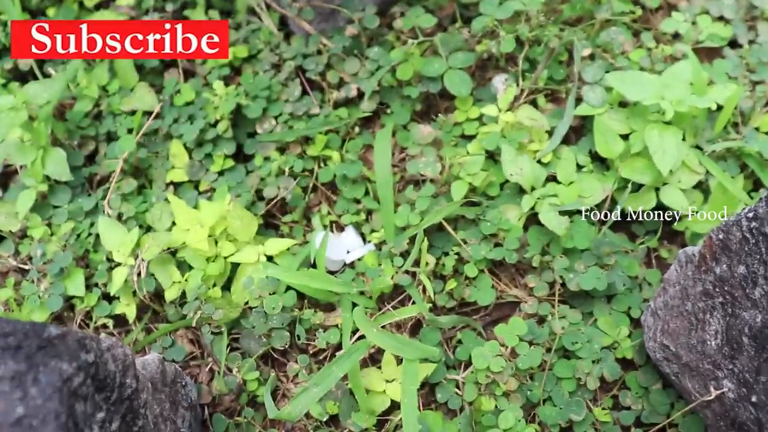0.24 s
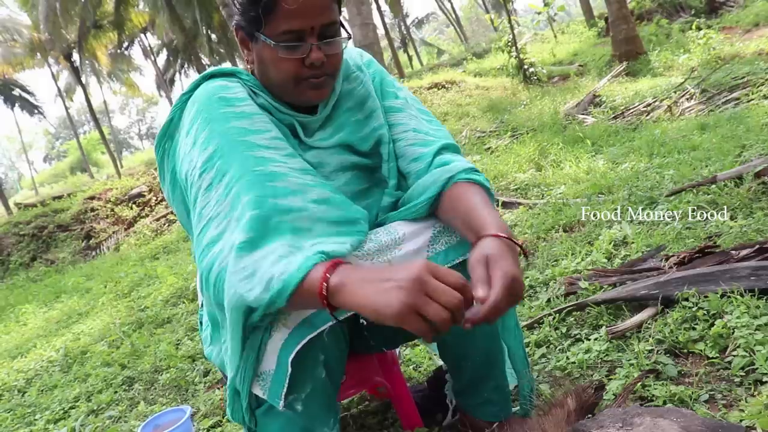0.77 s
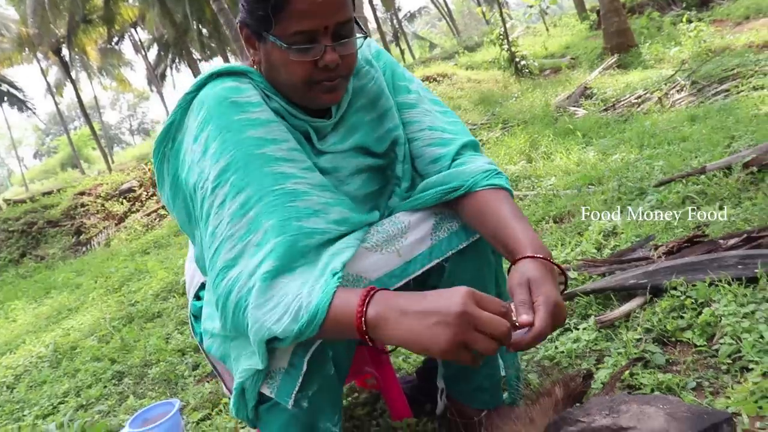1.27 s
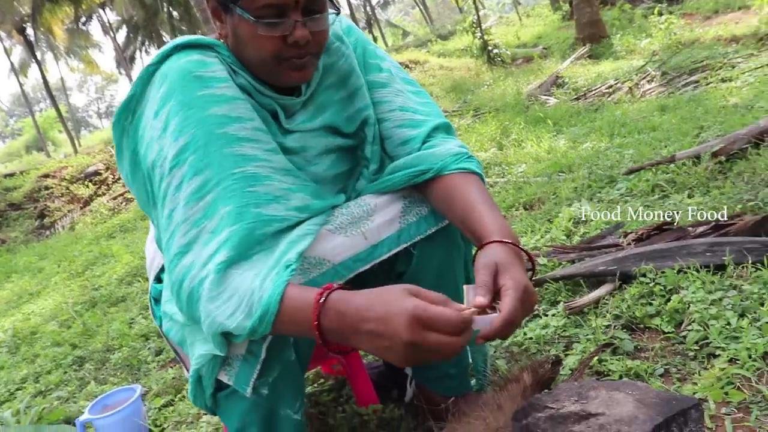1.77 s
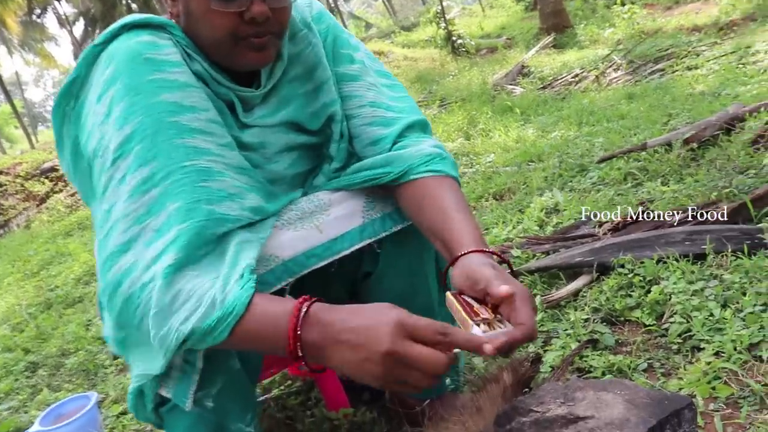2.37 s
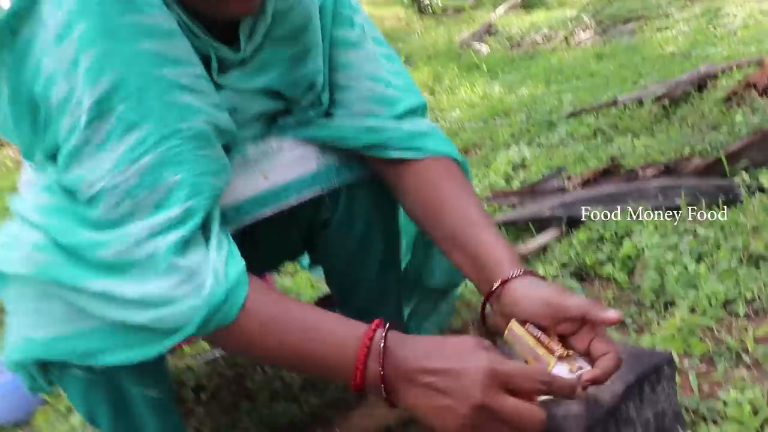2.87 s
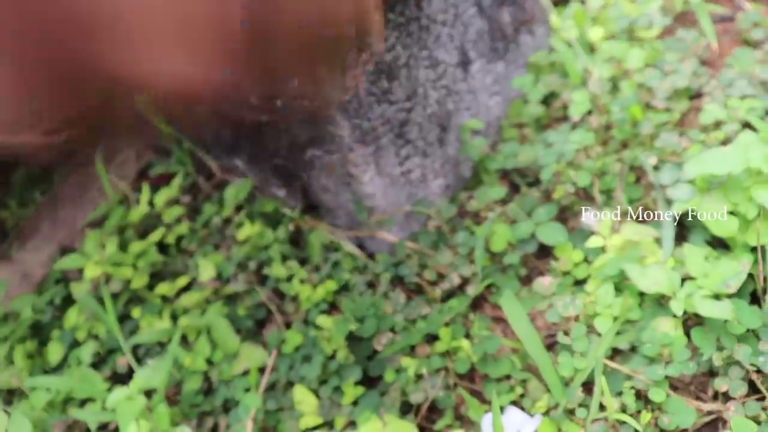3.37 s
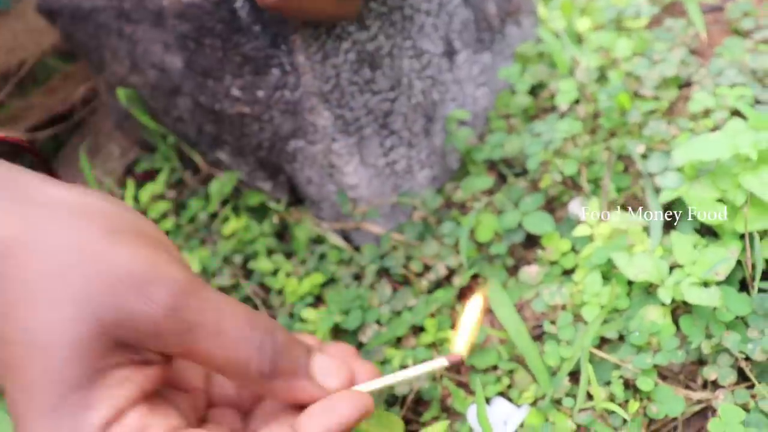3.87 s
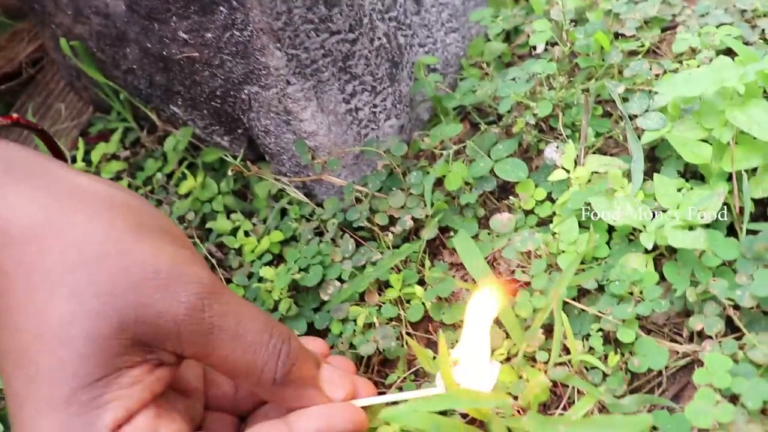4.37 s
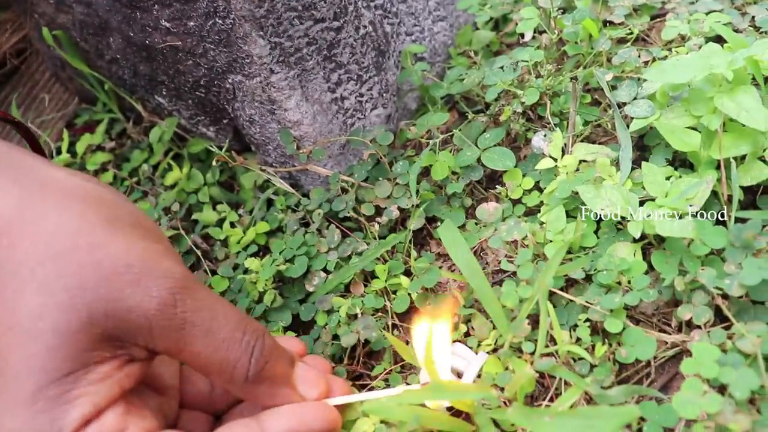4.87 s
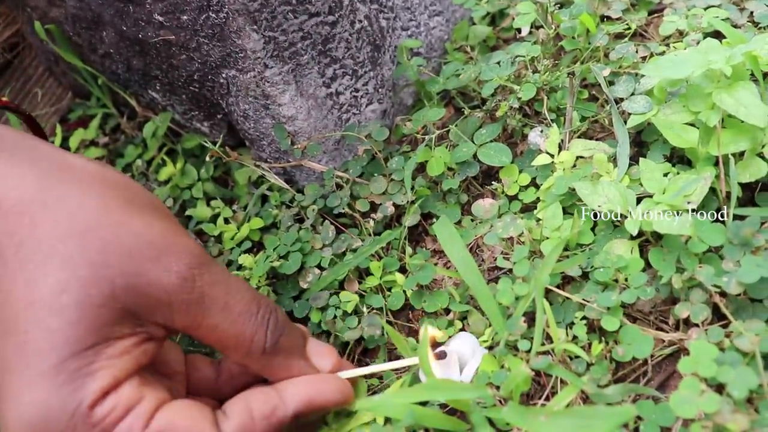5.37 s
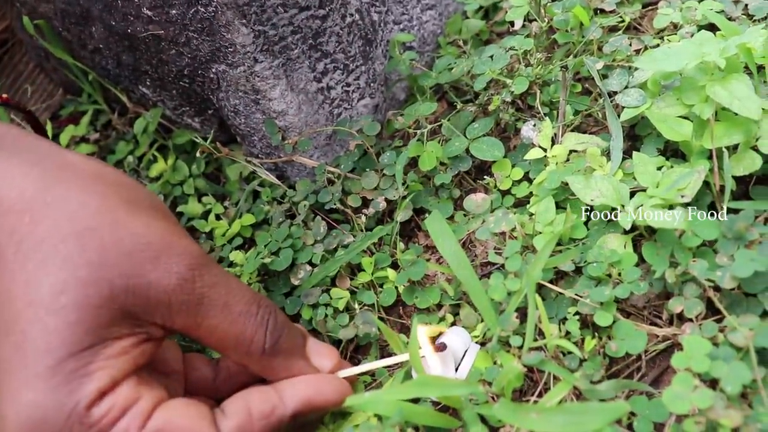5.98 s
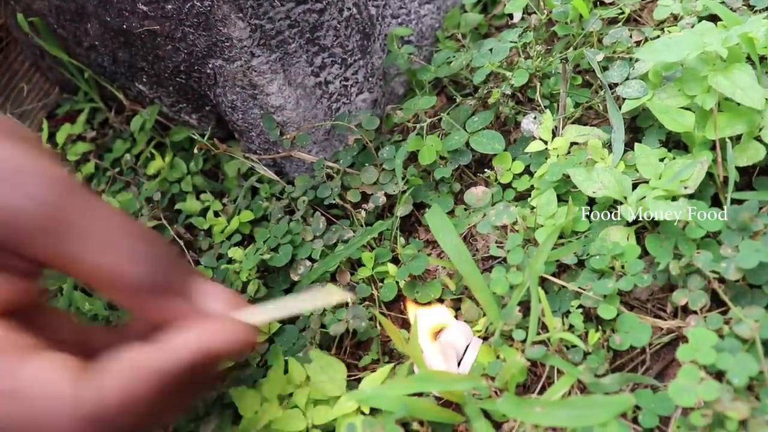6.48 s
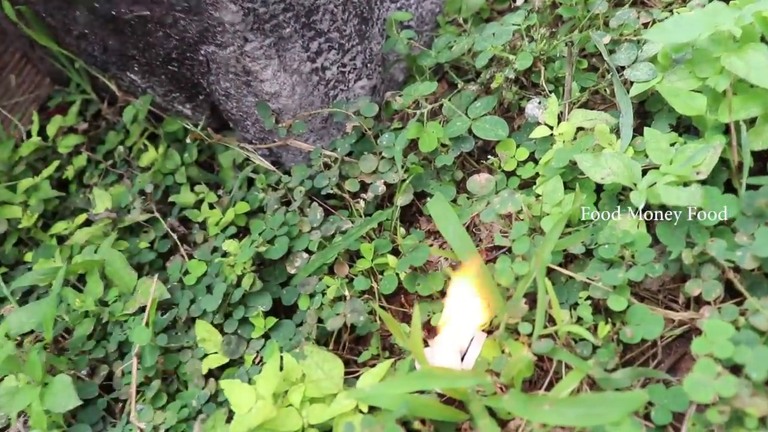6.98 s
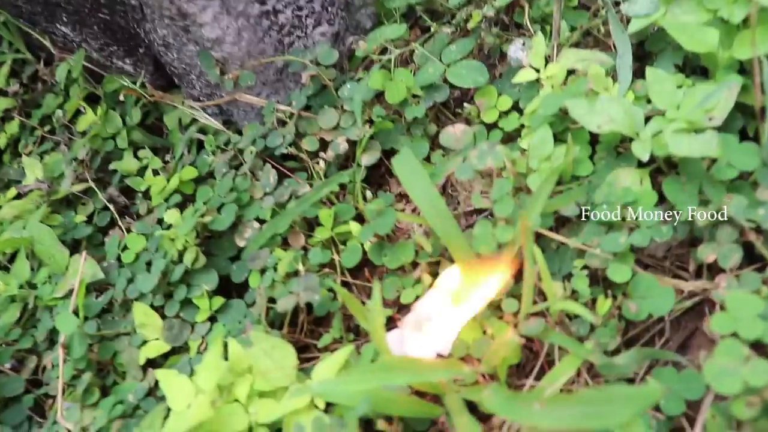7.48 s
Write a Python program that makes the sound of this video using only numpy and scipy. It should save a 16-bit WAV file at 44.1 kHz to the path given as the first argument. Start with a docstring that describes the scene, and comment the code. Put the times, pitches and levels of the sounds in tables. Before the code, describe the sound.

Quiet open air with a distant engine drone and wind bumping the microphone. First a dull hollow knock and light box taps amid cloth rustle, then a brief card slide and a few thin far cheeps. A very sharp, loud match scrape follows, bursting into a breathy hiss with pops and low flutter for about a second and a half. Afterwards come a hoarse far bird, grass rustling and small clicks.

```python
"""Outdoors: a far motor hums over low rumble, wind buffeting and leaf hiss while cloth and grass rustle.
Hands tap a matchbox, knock, push its tray shut and strike a match, whose head flares and sputters.
Far off one bird cheeps and a hoarse one calls once. Filtered noise makes air, friction, gas and the call;
decaying modes make the taps and knocks; noise-modulated sines make the cheeps; delays make the echoes."""
import sys
import numpy as np
from scipy import signal
from scipy.fft import rfft, irfft, next_fast_len
from scipy.io import wavfile
from scipy.ndimage import uniform_filter1d, map_coordinates

SR = 44100
rng = np.random.default_rng(int(sys.argv[2]) if len(sys.argv) > 2 else 0)


def pcm_store(signal):
    """Save signal as 16-bit PCM."""
    levels = np.round(np.clip(np.atleast_2d(signal), -1, 1) * 32767)
    wavfile.write(sys.argv[1], SR, levels.astype(np.int16).T)


N = 341201


def amp(db):
    """Level law: decibels to amplitude gain."""
    return 10 ** (np.asarray(db) / 20)


def rms_one(x):
    """Power normalisation: scale to rms 1."""
    return x / np.sqrt(np.mean(x ** 2) + 1e-20)


def in_time(rows):
    """Linear interpolation: table columns as curves, and a smoothed gate open inside the table."""
    t = np.arange(N) / SR
    s, *columns = np.transpose(rows)
    curves = [np.interp(t, s, column) for column in columns]
    inside = (t >= s[0]) & (t <= s[-1])
    return curves, uniform_filter1d(inside * 1., size=130)


def at_hz(points, hz):
    """Spectral interpolation on a log-frequency axis."""
    table_hz, value = np.array(points)[:, 0], np.array(points)[:, 1]
    return np.interp(np.log(hz), np.log(table_hz), value)


def bin_frequencies(size):
    """Fourier bins: their frequencies in Hz, kept above zero for the log axis."""
    return np.maximum(np.arange(size // 2 + 1) * SR / size, 1)


def coloured(x, spectrum):
    """Linear filtering: give white input a spectrum; rms 1."""
    size = next_fast_len(N)
    gain = amp(at_hz(spectrum, bin_frequencies(size)))
    return rms_one(irfft(rfft(x, size) * gain, size)[..., :N])


def drift(corner_hz):
    """Low-passed noise: a slow random curve of spread 1, from two equal poles."""
    r = np.exp(-20 * np.pi * corner_hz / SR)      # runs at a tenth of the sample rate
    noise = rng.standard_normal(N // 10 + 4002)
    slow = signal.lfilter([1], [1, -2 * r, r * r], noise)[4000:]
    return np.interp(np.arange(N) / 10, np.arange(len(slow)), rms_one(slow - slow.mean()))


def grains(spread_db):
    """Impulsive noise: dense random clicks whose sizes have a long tail."""
    return rng.standard_normal(N) * amp(spread_db * np.minimum(rng.exponential(1, N), 5))


def resonances(x, peaks):
    """Parallel resonators of (frequency [Hz], width [Hz], level [dB]), alternating in sign; rms 1."""
    out = 0
    for k, (hz, width_hz, level_db) in enumerate(peaks):
        r = np.exp(-np.pi * width_hz / SR)
        poles = [1, -2 * r * np.cos(2 * np.pi * hz / SR), r * r]
        ringing = rms_one(signal.lfilter([1, 0, -1], poles, x))
        out = out + (-1) ** k * amp(level_db) * ringing
    return rms_one(out)


def panned(x, pan_db):
    """Interchannel level difference: mono to left and right."""
    return x * amp(np.array([pan_db / 2, -pan_db / 2]).reshape(2, -1))


def modes(table, length_s):
    """Modal decay: one exponentially damped sine a row."""
    hz, level_db, t60 = np.array(table).T[:, :, None]
    t = np.arange(int(length_s * SR)) / SR
    return amp(level_db - 60 * t / t60) * np.sin(2 * np.pi * hz * t)


def add(out, s, piece):
    """Superposition: mix a piece in at a time."""
    i = round(s * SR)
    out[..., i:i + piece.shape[-1]] += piece[..., :N - i]


def swell(start_s, length_s, rise_s, fall_s):
    """Amplitude envelope of height 1: linear rise, hold, exponential fall."""
    t = np.arange(int((length_s + 8 * fall_s) * SR)) / SR
    out = np.zeros(N)
    add(out, start_s, np.minimum(t / rise_s, 1) * np.exp(-np.maximum(t - length_s, 0) / fall_s))
    return out


def open_air():
    """Partial coherence: rumble and leaf hiss are alike in both channels only in the bass; a motor hums in bands."""
    # background: (time [s], rumble level [dB], motor level [dB])
    air = [(0.0, -54, -45.5), (0.4, -42, -55), (0.7, -50, -49), (0.74, -54, -69), (0.95, -51, -47.5),
           (1.32, -51.5, -61), (1.45, -54.5, -82), (1.8, -57.5, -82), (1.92, -53, -58), (2.33, -52.5, -72),
           (3.03, -50.5, -64), (3.09, -52, -50.5), (3.3, -51.5, -49.5), (3.82, -49.5, -50.5),
           (4.81, -49, -47.5), (5.3, -50.5, -51.5), (6.0, -51, -54.5), (7.3, -49, -49.5),
           (7.74, -49.5, -50)]
    # noise colours: (frequency [Hz], relative density [dB])
    rumble_spectrum = [(15, -48), (30, -28), (123, 0), (340, -5.5), (525, -12.5), (667, -17.5), (719, -55),
                       (900, -15), (1170, -57), (1980, -120)]
    leaf_spectrum = [(240, -25), (400, -8), (528, -9), (676, -5.5), (1230, -6), (1290, -5.5), (2430, -6.5),
                     (3120, -6.5), (7280, -18), (12300, -31), (16000, -28)]
    # left-right coherence, negative for opposite phase: (frequency [Hz], correlation [-1 to 1])
    likeness = [(60, 1), (180, 0.83), (550, 0.64), (1650, -0.4), (4970, -0.2), (15000, -0.034)]
    # motor lines: (frequency [Hz], width [Hz], relative level [dB])
    motor_lines = [(41, 8, -42.5), (86.9, 2.2, 3.5), (128.2, 8.7, 2), (168.4, 6.3, -6)]

    (rumble_db, hum_db), _ = in_time(air)
    size = next_fast_len(N)
    alike = np.clip(at_hz(likeness, bin_frequencies(size)), -1, 1)
    mid, side = rfft(rng.standard_normal((2, 2, size)))

    def stereo(middle, difference):
        spectrum = np.sqrt(1 + alike) * middle + np.sqrt(1 - alike) * difference * [[1], [-1]]
        return irfft(spectrum, size)[:, :N]
    rumble = coloured(stereo(mid[0], side[0]), rumble_spectrum)
    leaves = coloured(stereo(mid[1], side[1]), leaf_spectrum)
    hum = resonances(rng.standard_normal(N), motor_lines)
    leaves_level = amp(-47 + 1.58 * drift(1.5))
    hum_level = amp(hum_db - 0.1 * drift(2.7))
    return amp(rumble_db) * rumble + leaves_level * leaves + hum_level * hum


def wind():
    """Turbulent pressure on the microphone: lumpy low noise, partly independent at each port."""
    # wind: (time [s], mean level [dB], left minus right [dB])
    puffs = [(0.0, -50, 17), (0.3, -54, 4), (0.69, -57, 2), (0.78, -66, 16), (0.93, -48.5, 28),
             (1.27, -62.5, 24), (1.49, -69, 1.5), (1.75, -82, 0.5), (1.87, -63, 0.5), (2.22, -82, -0.5),
             (2.82, -74, -2), (3.17, -54.5, 5), (4.2, -60, 5), (7.74, -55.5, 4)]
    gust_spread_db = 1.8
    (level_db, pan_db), _ = in_time(puffs)
    common, own = rng.standard_normal(N), rng.standard_normal((2, N))
    low_band = signal.butter(3, [44, 80], "band", fs=SR, output="sos")
    lows = signal.sosfilt(low_band, common + 0.51 * own)
    return rms_one(lows) * panned(amp(level_db + gust_spread_db * drift(1.7)), pan_db)


def rustle():
    """Granular friction: a bright swish, different in each channel, and a duller centred rustle."""
    # restless hands and cloth: (time [s], bright swish level [dB], dull rustle level [dB])
    fidget = [(0.0, -59, -53), (0.3, -58.5, -49.5), (0.7, -55.5, -51), (1.0, -57.5, -49.5),
              (1.4, -63.5, -53.5), (1.9, -71, -56), (2.25, -64, -63), (3.05, -56.5, -52.5),
              (3.11, -86, -61), (3.5, -76, -69), (5.1, -57, -54), (5.25, -64, -83), (5.92, -64, -82),
              (6.1, -62, -82), (6.6, -62.5, -59.5), (7.05, -54.5, -55.5), (7.74, -60, -59)]
    # rustle bursts, mostly rubs of cloth, skin and grass; at 0.706 s the rustle rises suddenly: # (start [s],
    # rise [s], length [s], bright swish level [dB], dull rustle level [dB], left minus right [dB])
    rustle_bursts = [(0.345, 0.05, 0.12, -53, -53, 2.5), (0.55, .035, 0.056, -56, -54, 1.5),
                     (0.706, 0.0033, 0.042, -53, -53.5, 1), (0.801, .004, 0.028, -62, -38, -8),
                     (0.851, 0.0045, 0.014, -61, -38, 7), (0.955, .035, 0.034, -47, -50, -1.5),
                     (1.179, .003, 0.0076, -64, -37, -1.5), (1.233, 0.022, 0.055, -60, -43.5, -1.5),
                     (1.395, 0.018, 0.034, -68, -56, -0.5), (1.857, .03, .045, -73, -63, 0),
                     (2.406, 0.022, 0.13, -62.5, -52, -2), (2.555, 0.014, 0.12, -59, -52.5, -2.5),
                     (6.42, .06, 0.061, -60, -71, -1), (6.668, 0.088, 0.27, -49.5, -52.5, 4),
                     (7.07, 0.034, 0.13, -62, -61, 11), (7.413, 0.032, 0.17, -66, -62, 10),
                     (7.594, 0.087, 0.079, -52, -53.5, 6)]
    # swish colour: (frequency [Hz], relative density [dB])
    swish_spectrum = [(2060, -33), (3500, -20), (5290, 6), (7090, 7.5), (10100, 2.5), (13800, 0.5),
                      (16000, 0.5)]
    burst_fall_s = 0.0068

    (bright_db, dull_db), _ = in_time(fidget)
    restless = amp(3.2 * drift(8.5))
    bright, low = np.ones((2, 2, 1)) * restless * amp([[bright_db], [dull_db]])
    for start_s, rise_s, length_s, burst_bright_db, burst_dull_db, pan_db in rustle_bursts:
        burst = panned(swell(start_s, length_s, rise_s, burst_fall_s), pan_db)
        bright = bright + amp(burst_bright_db) * burst
        low = low + amp(burst_dull_db) * burst
    swish = coloured(np.array([grains(1.9), grains(1.2)]), swish_spectrum)
    dull = resonances(grains(4.9), [(1310, 1360, -1.5), (2560, 850, 1.5), (3010, 1100, -1.0)])
    dull = signal.sosfilt(signal.butter(2, 6500, fs=SR, output="sos"), dull)
    return amp(1.2 * drift(38)) * (bright * swish + low * dull)


def box_hits(events, rattle_s, focus_octaves):
    """Modal excitation: contact rattles ring the box modes, loudest near each hit's pitch, with a bright crack."""
    # matchbox and sticks: (frequency [Hz], relative level [dB], 60 dB decay time [s])
    box_modes = [(1090, -2, 0.03), (1335, 6, 0.0074), (1570, -6, 0.0057), (2145, 1.5, 0.013),
                 (2580, 0.5, 0.0092), (3100, 2.5, 0.0095), (3510, 7, 0.0091), (3800, 0, 0.017),
                 (4640, 6.5, 0.0053), (5250, 0, 0.011), (6100, 8, 0.0057), (7880, 14.5, 0.01),
                 (10200, -25, 0.007)]
    out, rings, mode_hz = np.zeros((2, N)), modes(box_modes, .06), np.array(box_modes)[:, 0]
    thin = signal.butter(8, 940, "high", fs=SR, output="sos")      # a small box radiates no bass
    bright = signal.butter(2, [4300, 13000], "band", fs=SR, output="sos")
    chance = rng.standard_normal((len(events), 2, 900))
    fall = np.exp(-np.arange(900) / (rattle_s * SR))
    for (s, peak_db, hz, crack_db, pan_db), (contacts, luck) in zip(events, chance):
        rattle = fall * contacts * np.abs(contacts)
        rattle[0] += 6.0      # first contact is the firmest
        distance = np.abs(np.log2(mode_hz / hz)) / focus_octaves
        share = amp(-6.0 * distance + 1.5 * luck[:len(box_modes)])
        hit = signal.sosfilt(thin, signal.fftconvolve(share @ rings, rattle))
        right_rattle = 0.11 * rattle + fall * luck * np.abs(luck)      # mostly its own noise
        crack = signal.sosfilt(bright, fall * [rattle, right_rattle])
        add(out, s, panned(amp(peak_db) * hit / np.abs(hit).max(), pan_db))
        add(out, s, panned(amp(crack_db) * crack / np.abs(crack).max(), pan_db))
    return out


def taps():
    """Impact excitation: taps on the box and small ticks."""
    # (time [s], peak before panning [dB], loudest mode [Hz], crack peak before panning [dB], left minus right [dB])
    tap_events = [(0.3875, -32, 1400, -32, 6), (0.4645, -18.5, 1490, -35, 14),
                  (0.4695, -26, 2600, -20.5, 1), (0.561, -32.5, 1260, -42, 6), (0.584, -40, 1600, -26.5, 2),
                  (0.706, -34, 3700, -36, -8), (0.722, -36, 3580, -42, -6), (0.7572, -34, 3430, -40, -4),
                  (0.8045, -35, 2600, -43, -7), (0.813, -35, 2400, -48, -18), (0.8205, -17, 1950, -47, 8),
                  (0.8245, -31, 4700, -46, -1), (0.859, -20.5, 2190, -42, 5),
                  (0.8672, -24.5, 2400, -45, -11), (1.0036, -36, 1410, -47, 4),
                  (1.1843, -41, 1970, -49, -11), (1.248, -47, 1400, -47, 0), (1.268, -34, 1750, -49, -16),
                  (1.28, -38, 1300, -47, 4), (1.426, -32.5, 1940, -47, -5), (1.492, -58, 7800, -41, -1.5),
                  (1.508, -44, 4000, -52, 2), (1.5843, -35, 2400, -48, -5), (1.8164, -42, 3040, -35, 4),
                  (1.891, -35.5, 2520, -49, -7), (2.17, -27, 3670, -33, -13), (2.1884, -31, 2080, -29, 0),
                  (2.22, -39, 3210, -35.5, 8), (2.582, -32.5, 2110, -47, -7), (2.832, -36, 7800, -40, 3),
                  (3.493, -34, 2260, -50, -1.5), (5.924, -38, 5070, -47, 3), (6.731, -32, 1400, -44, 0.5),
                  (6.76, -39.5, 1070, -50, 2), (6.787, -33, 1910, -32, 1), (6.89, -32, 2500, -40, 9),
                  (7.068, -41, 3500, -48, 0), (7.37, -35, 3000, -48, -4), (7.425, -40.5, 1200, -52, 6),
                  (7.48, -38, 1900, -52, 4), (7.535, -27, 2200, -49, 8), (7.667, -46, 2020, -36, -1)]
    return box_hits(tap_events, rattle_s=0.0036, focus_octaves=0.23)


def knock():
    """Damped modal resonance: soft contacts ring a hollow body in a dull triple knock near the microphone."""
    # contacts: (time [s], level [dB])
    contacts = [(.4630, -22), (.4646, -6), (.4697, -4)]
    # hollow body: (frequency [Hz], relative level [dB], 60 dB decay time [s])
    hollow_modes = [(175, -2, 0.016), (342, -9, 0.065), (398, -1, 0.022), (848, -14, 0.039),
                    (1330, -11, 0.0037), (2440, -25, 0.012)]
    out, body = np.zeros(N), modes(hollow_modes, .12).sum(axis=0)
    soft_contact = np.hanning(9) / 4
    for s, level_db in contacts:
        add(out, s, amp(level_db) * np.convolve(body / np.abs(body).max(), soft_contact))
    no_rumble = signal.butter(2, 90, "high", fs=SR, output="sos")
    return panned(signal.sosfilt(no_rumble, out), 2.7)


def tray():
    """Friction-driven resonance: card drags on card, the tightening sleeve squeaks in narrow bands, then stops."""
    # tray sliding into the sleeve: (time [s], level [dB], squeak gain [ratio], left minus right [dB])
    slide = [(1.92, -55, 0.3, 2), (1.96, -40.5, 0.23, 9), (2.0, -38.5, 0.38, 7), (2.05, -39.5, 0.27, 3),
             (2.085, -42, 0.8, 1), (2.12, -37.5, 1.2, 1), (2.178, -36.5, 1.33, -11.5),
             (2.185, -49, 0.9, -10)]
    # card colour: (frequency [Hz], relative density [dB])
    card_spectrum = [(290, -43), (500, -13), (1380, -0.5), (1720, -2), (2500, 0.5), (2850, -3.5),
                     (3860, -5), (5160, -10), (9220, -11.5), (16000, -14)]
    # sleeve resonances: (frequency [Hz], width [Hz], relative left level [dB], relative right level [dB])
    squeak_bands = np.array([(1900, 260, -9, -24), (2600, 140, 5, -19), (3770, 150, -24, 22),
                             (4800, 440, -2, 7), (6300, 530, -10, 12.5), (8900, 1200, 8, -17)])
    (level_db, squeak, pan_db), gate = in_time(slide)
    drag = grains(2.2)
    own = coloured(rng.standard_normal((2, N)), card_spectrum)     # differs in each channel
    sleeve = np.array([resonances(drag, squeak_bands[:, [0, 1, column]]) for column in (2, 3)])
    sound = 0.17 * coloured(drag, card_spectrum) + 0.7 * own + np.clip(squeak, 0, 3) * sleeve
    return panned(gate * amp(level_db + 1.2 * drift(60)), pan_db) * sound


def cheeps():
    """Amplitude and phase modulation: a far bird's short thin notes, blurred by distance."""
    # notes: (start [s], relative level [dB], frequency [Hz])
    notes = [(2.22, -49.5, 3050), (2.535, -48.5, 3150), (2.839, -52, 3090), (5.28, -60, 3120),
             (5.575, -62, 3170), (5.865, -57, 3240), (6.18, -54, 3150), (6.48, -62, 3120)]
    hold_s, rise_s, tail_s, blur_hz = 0.024, .01, 0.017, 130
    turns = 2 * np.pi * np.arange(N) / SR
    blur = drift(blur_hz) + 1j * (0.92 + drift(blur_hz))
    out = 0
    for s, level_db, hz in notes:
        note = np.real(blur * np.exp(1j * hz * turns))
        out = out + amp(level_db) * swell(s, hold_s, rise_s, tail_s) * note
    return out


def strike():
    """Repeated impact: the match head skips along the striking strip."""
    # (time [s], peak before panning [dB], loudest mode [Hz], crack peak before panning [dB], left minus right [dB])
    skips = [(3.4469, -3, 1870, -14, -5), (3.4504, 0.5, 1470, -3.5, -1.5), (3.4535, -9.5, 1660, -12, -1),
             (3.4575, -14.5, 2280, -13, 12), (3.4620, -13, 3060, -30, 0)]
    return box_hits(skips, rattle_s=.0012, focus_octaves=0.5)


def flare():
    """Monopole bursts: gas pockets of one sign make a fluttering hiss and low roar, combed by close echoes."""
    # the head catches, burns fiercely, then sputters: (time [s], hiss level [dB], roar level [dB])
    burn = [(3.5, -66, -84), (3.55, -58.5, -46), (3.68, -54, -47.5), (3.8, -36.5, -48.5), (3.97, -41, -46),
            (4.27, -37.5, -45), (4.34, -44, -46.5), (4.49, -43, -46), (4.66, -41, -44.5),
            (4.675, -51, -49.5), (4.9, -56.5, -50.5), (5.1, -55.5, -50), (5.13, -72, -70)]
    # surges of gas on top of the burn: (start [s], length [s], hiss lift [dB])
    surges = [(3.559, 0.021, 12), (3.606, 0.044, 2.5), (3.643, 0.013, 14), (3.708, .012, -1),
              (4.34, 0.02, 4.5), (4.385, 0.08, 6.5), (4.506, 0.053, 4), (4.633, 0.031, 4),
              (4.797, 0.022, 7.5), (4.862, 0.025, 12.5), (4.917, 0.062, 8.5), (4.99, 0.049, 14),
              (5.041, .045, 10.5)]
    # spits: (time [s], reference level of pop and puff [dB], low thump level [dB])
    spits = [(3.562, -20, -33), (3.649, -24, -47), (3.711, -24, -40), (3.74, -24, -46), (3.779, -26, -45),
             (3.839, -34, -53), (4.35, -23, -41), (4.368, -27, -48), (4.434, -25, -36), (4.733, -25, -50),
             (4.796, -18, -46), (4.85, -28, -50), (4.872, -30, -48), (4.952, -22, -45), (4.994, -19, -50),
             (5.016, -20, -45), (5.063, -26, -48), (5.084, -25, -46), (5.1, -23, -52)]
    # hiss colour: (frequency [Hz], relative density [dB])
    hiss_spectrum = [(290, -42), (500, -54.5), (1260, 4.5), (3250, 3), (7860, -2), (9630, -3.5),
                     (16000, -8)]
    # roar bands: (frequency [Hz], width [Hz], relative level [dB])
    roar_bands = [(340, 290, -1), (478, 155, 0), (800, 250, -7)]
    # ground echo as the flame sinks: (time [s], delay [ms], gain [ratio])
    ground = [(3.5, 0.69, .6), (3.85, 0.41, 0.39), (3.98, 0.35, 0.5), (4.1, 0.25, 0.57), (4.25, 0.22, 0.55),
              (4.55, 0.23, 0.27), (5.2, 0.25, 0.2)]
    # palm echo, heard on the right: (time [s], delay [ms], phase turn [rad], gain [ratio])
    palm = [(3.5, .31, -1.9, .5), (3.85, .31, -1.2, .7), (4.0, .305, -.2, .9), (4.27, .312, 2.1, .9),
            (4.6, .312, 2.1, .9), (4.9, .35, 3.9, .9), (5.2, .35, 3.9, .9)]
    # band favoured by the right port: (frequency [Hz], width [Hz], relative level [dB])
    right_port = [(3010, 480, 0)]
    surge_rise_s, surge_fall_s, roar_follows = 0.015, 0.002, 0.36
    thump_fall_s, puff_fall_s = 0.0067, .004

    (hiss_db, roar_db), gate = in_time(burn)
    lift_db = sum(db * swell(s, length_s, surge_rise_s, surge_fall_s) for s, length_s, db in surges)
    puffs, pops, thumps = np.zeros((3, N))
    for s, spit_db, thump_db in spits:
        add(thumps, s, amp(thump_db) * np.exp(-np.arange(2500) / (thump_fall_s * SR)))
        add(puffs, s, amp(spit_db - 20.5) * np.exp(-np.arange(1500) / (puff_fall_s * SR)))
        add(pops, s, -amp(spit_db - 1.0) * np.hanning(5))
    flutter = amp(1.75 * drift(60))
    bursts = -np.abs(grains(3.15))
    bursts = bursts - bursts.mean()
    hiss_level = gate * flutter * amp(hiss_db + lift_db) + puffs
    roar_level = gate * flutter * amp(roar_db + roar_follows * lift_db) + thumps
    jet = coloured(bursts, hiss_spectrum) * hiss_level + pops
    flame = jet + resonances(bursts, roar_bands) * roar_level
    (ground_ms, ground_share), _ = in_time(ground)
    (palm_ms, turn, palm_share), _ = in_time(palm)

    def late(x, ms):
        return map_coordinates(x, [np.arange(N) - ms * SR / 1000], order=3)
    dull = signal.lfilter(*signal.butter(1, 7500, fs=SR), flame)     # grass returns little treble
    left = flame + ground_share * late(dull, ground_ms)
    sharp = signal.filtfilt(*signal.butter(2, 4200, "high", fs=SR), left)     # a hand reflects only short waves
    turned = np.real(signal.hilbert(sharp, next_fast_len(N))[:N] * np.exp(1j * turn))
    port = 0.65 * np.std(left) * resonances(left, right_port)
    right = left + palm_share * late(turned, palm_ms) + port
    # independent treble hiss follows the jet and widens the flare, mostly on the left
    own_hiss = coloured(rng.standard_normal((2, N)), hiss_spectrum) * uniform_filter1d(np.abs(jet), size=90)
    own_hiss = signal.lfilter(*signal.butter(2, 3500, "high", fs=SR), own_hiss)
    # the left port faces away
    shaded = signal.lfilter(*signal.butter(2, 9300, fs=SR), left + amp(4.0) * own_hiss[0])
    return np.array([shaded, amp(-0.8) * right + amp(-9.0) * own_hiss[1]])


def bird():
    """Formant bands of noise: a far hoarse call climbs slowly; effort opens a band above, a faint one sits high."""
    start_s, hold_s, level_db, fade_db_per_s = 6.01, 0.64, -53.5, 5.5
    peak_s, swell_s, swell_db = 6.22, 0.13, 5.5      # strongest here
    reference_hz, rise_hz_per_s = 1243, 180          # the bands lie at ratios of this pitch
    t = np.arange(N) / SR - start_s
    turns = 2 * np.pi * np.cumsum(reference_hz + rise_hz_per_s * t) / SR
    effort = np.exp(-((t + start_s - peak_s) / swell_s) ** 2)

    def band(ratio, width_hz):
        return drift(width_hz) * np.sin(ratio * turns) + drift(width_hz) * np.cos(ratio * turns)
    hoarse = band(0.99, 103) + 0.52 * effort * band(1.24, 70) + .12 * band(3.0, 250)
    level = swell(start_s, hold_s, .03, .015) * amp(level_db - fade_db_per_s * t + swell_db * effort)
    return panned(level * hoarse, 5.2)


def scene():
    """Superposition: all sources add at the two microphone ports."""
    background = open_air() + wind() + rustle()
    matchbox = taps() + knock() + tray() + strike()
    return background + matchbox + cheeps() + flare() + bird()


def record(dry):
    """Saturation and band limiting: the highest peaks are rounded, then the top is cut."""
    dry = dry / (1 + np.abs(dry / .95) ** 6) ** (1 / 6)
    stopband_hz = 16377      # 70 dB down from here up
    return signal.sosfilt(signal.cheby2(16, 70, stopband_hz, fs=SR, output="sos"), dry)


dry = scene()
out = record(dry)
pcm_store(out)
```